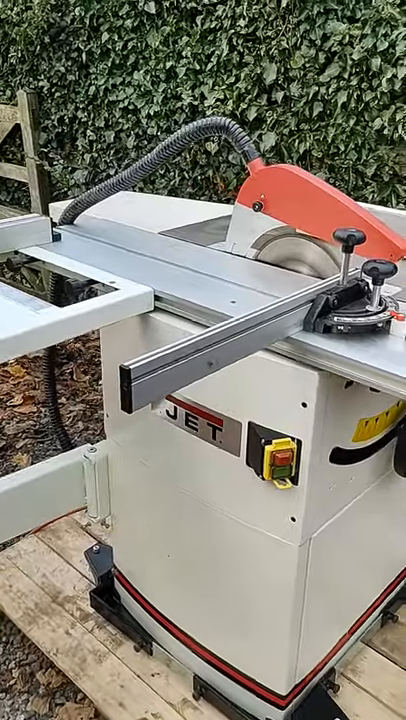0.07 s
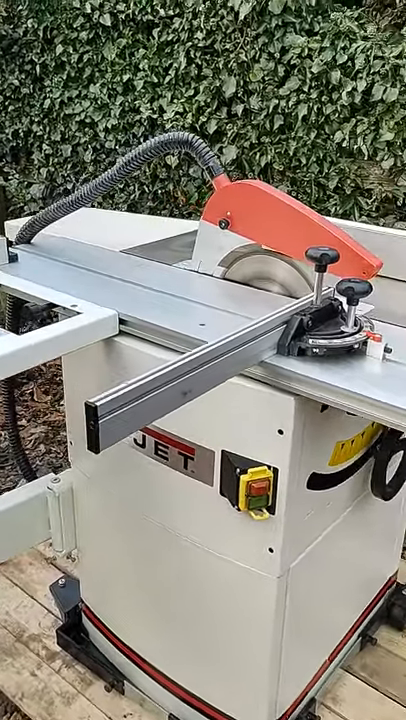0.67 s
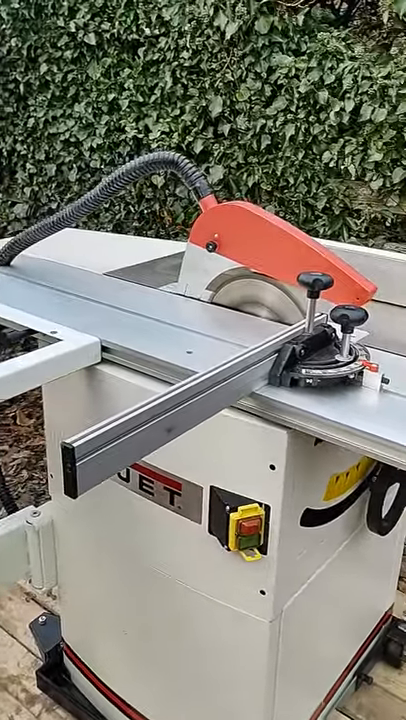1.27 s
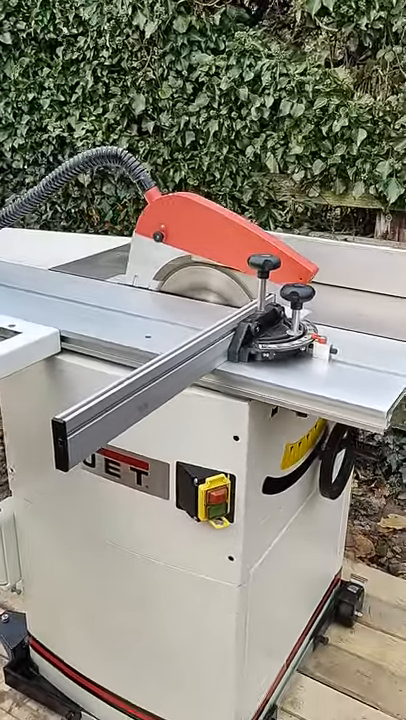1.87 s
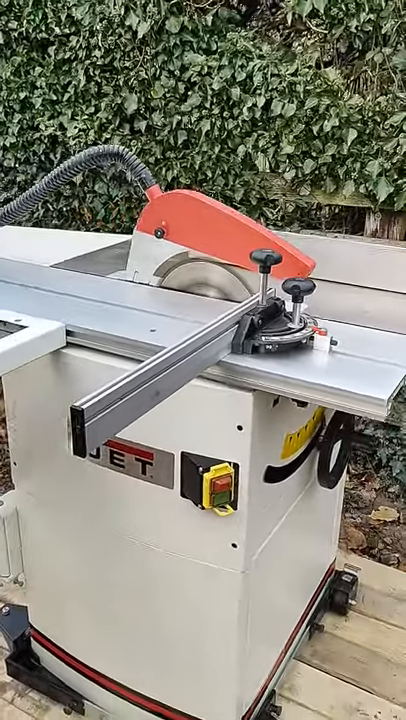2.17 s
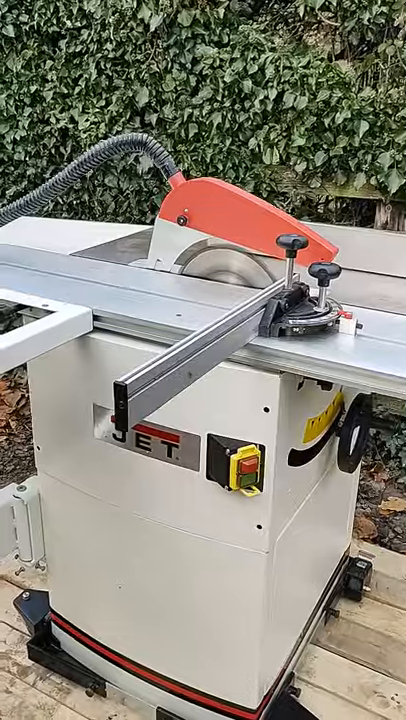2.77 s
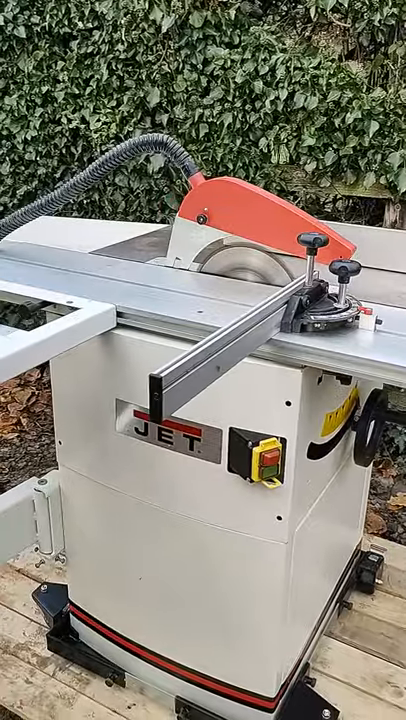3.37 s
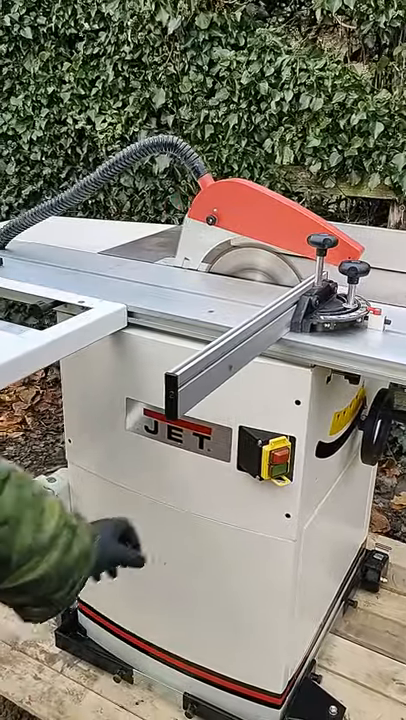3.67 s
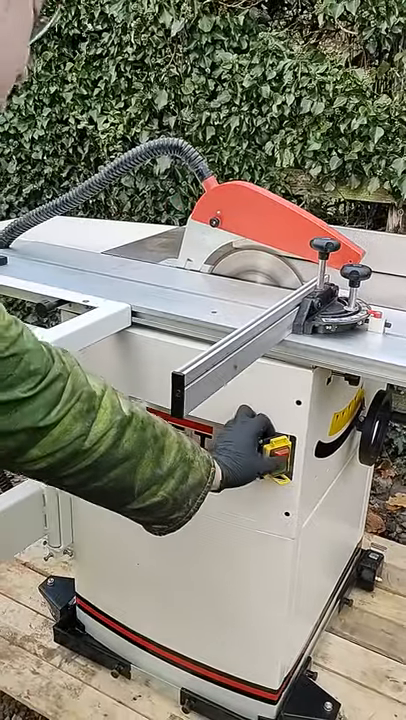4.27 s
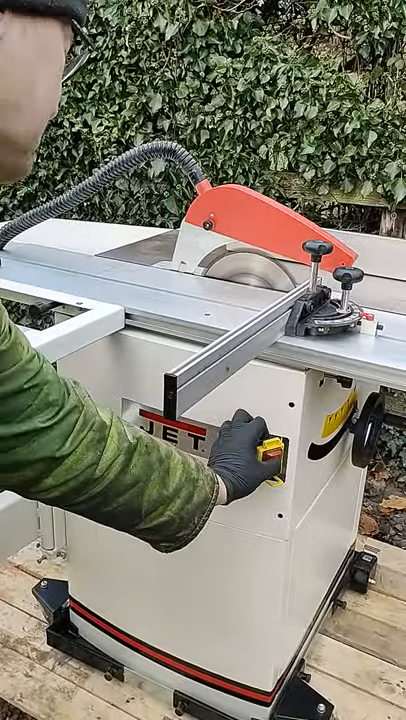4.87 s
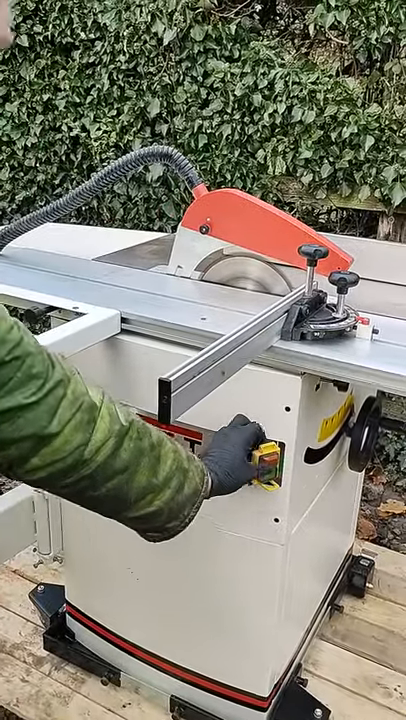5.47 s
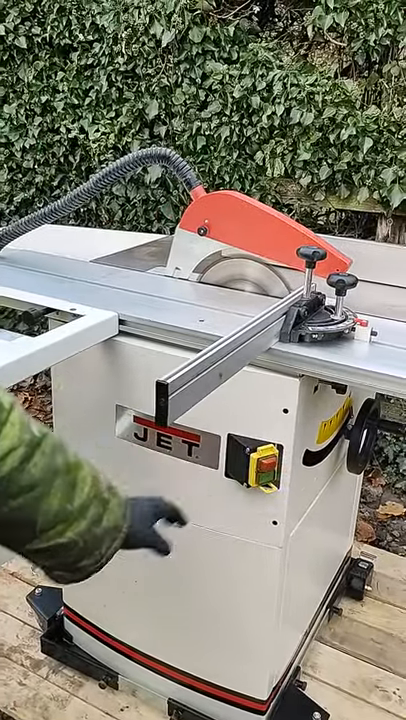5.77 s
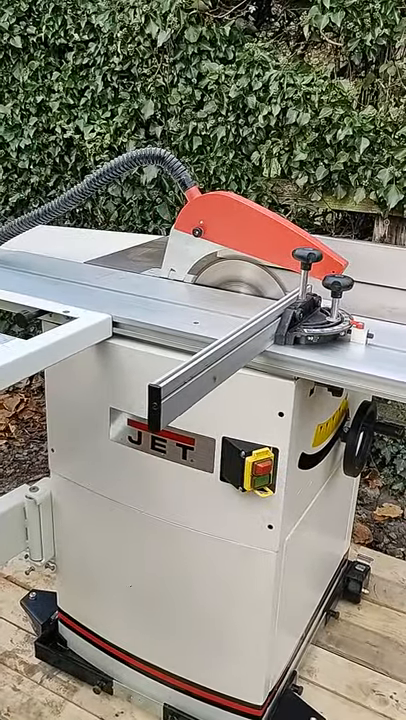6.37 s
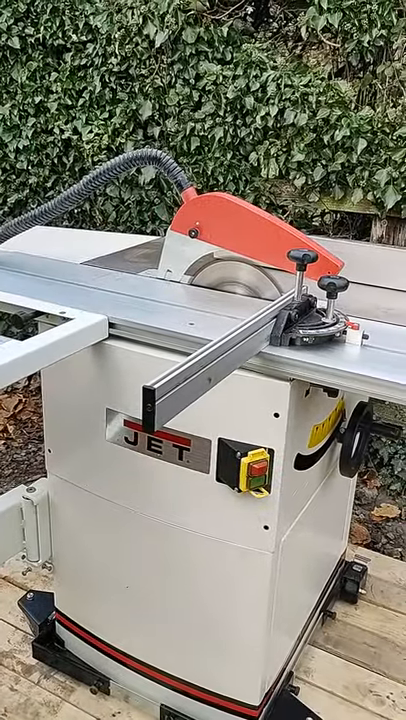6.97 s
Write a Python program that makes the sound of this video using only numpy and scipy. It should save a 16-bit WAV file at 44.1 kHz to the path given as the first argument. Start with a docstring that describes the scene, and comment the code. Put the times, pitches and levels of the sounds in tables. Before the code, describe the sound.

A circular saw bench idles outdoors with a steady hiss and whistle, then winds down in pitch with one sharp clack.

```python
"""A steady hiss and whistle over a low hum: a belt-driven circular saw bench idles outdoors, close by.
Air torn by the forty teeth makes the hiss and whistle, and the motor hums in a sheet-steel cabinet.
The power is cut and the blade coasts. Then a relay clacks, the brake bites, and the blade's sounds
slide down in pitch, swelling as they pass the notes at which the steel naturally rings."""
import sys
import numpy as np
from scipy import signal
from scipy.fft import rfft, irfft, next_fast_len
from scipy.io import wavfile
from scipy.ndimage import map_coordinates

SR = 44100
rng = np.random.default_rng(int(sys.argv[2]) if len(sys.argv) > 2 else 0)


def to_wav(s):
    """Save 16-bit WAV."""
    ch = np.atleast_2d(s).T  # columns
    pcm = np.round(np.clip(ch, -1, 1) * 32767)  # PCM
    wavfile.write(sys.argv[1], SR, pcm.astype(np.int16))


N = 318843


def from_db(db):
    """Turn decibels into a number to multiply a sound by."""
    return 10 ** (np.asarray(db) / 20)


def in_time(rows):
    """Join (time_s, value) points with straight lines, giving a value for every sample."""
    return np.interp(np.arange(N) / SR, *np.transpose(rows))


def unit_power(x):
    """Scale a sound to an average power of 1."""
    return x / np.sqrt(np.mean(x ** 2) + 1e-20)


def drift(rate_hz):
    """A slow random wobble, about 1 in size."""
    hz = np.fft.rfftfreq(N, 1 / SR)
    return unit_power(irfft(rfft(rng.standard_normal(N)) / (1 + (hz / rate_hz) ** 2), N))


def colour(x, outline, unit_hz=1):
    """Shape a sound's lows and highs by (pitch, level_db) rows, then scale it to power 1."""
    size = next_fast_len(N)
    pitch, level_db = np.transpose(outline)
    hz = np.fft.rfftfreq(size, 1 / SR) + 1e-9
    gain = from_db(np.interp(np.log(hz), np.log(pitch * unit_hz), level_db, left=-120, right=-120))
    return unit_power(irfft(rfft(x, size) * gain, size)[:N])


def noise(outline, unit_hz=1):
    """Noise of power 1, shaped by (pitch, level_db) rows."""
    return colour(rng.standard_normal(N), outline, unit_hz)


def tone(hz, flutter_db=0, flutter_hz=5.6):
    """A pure tone that follows a pitch curve; its level wobbles by about flutter_db."""
    phase = 2 * np.pi * (np.cumsum(hz) / SR + rng.random())
    return np.sqrt(2) * np.sin(phase) * from_db(flutter_db * drift(flutter_hz))


def resonate(x, resonances):
    """A sound plus the ringing it stirs up at an object's natural pitches."""
    out = x
    for hz, width_hz, level_db in resonances:
        out = out + from_db(level_db) * signal.lfilter(*signal.iirpeak(hz, hz / width_hz, fs=SR), x)
    return out


def sweep_gain(hz, peaks):
    """How a sound swells and fades as its pitch slides through fixed peaks and dips."""
    return from_db(sum(db * np.exp(-(2 * (hz - peak_hz) / width_hz) ** 2)
                       for peak_hz, width_hz, db in peaks))


def eddies(outline, spin):
    """Noise of small swirls of air at the rim; its pitch slides with spin, in turns per second."""
    read_position = np.cumsum(spin / spin[0])
    return map_coordinates(noise(outline, spin[0]), [read_position], order=3, mode="wrap")


def garden_air():
    """The still outdoor air makes a faint, even noise."""
    # tone colour of the air: pitch_hz, level_db
    air_colour = [(20, -14), (60, -2.5), (90, 5.5), (130, 9), (200, 0), (400, -5), (1000, 3.5), (2700, -12),
                  (4500, -25.5), (7600, -23), (8600, -48)]
    return from_db(-56) * noise(air_colour)


def rushing_air(speed):
    """Air rushes through cabinet and guard; as the blade slows, the treble fades fastest."""
    # tone colour of the rush: pitch_hz, level_db
    rush_colour = [(20, -22.5), (60, -15), (90, -8.5), (125, 0), (170, 0), (270, 3), (370, -3), (520, 0.5),
                   (950, -5.5), (1400, -7), (3000, -1.5), (5600, -6), (7000, -5), (7600, -10.5),
                   (8600, -21)]
    # change in its treble as the listener steps round the bench: time_s, level_db
    treble_change = [(1.5, 0.5), (4, -2.5)]
    air = noise(rush_colour)
    body = signal.sosfiltfilt(signal.butter(1, 2400, fs=SR, output="sos"), air, padtype="even")
    treble = (air - body) * from_db(in_time(treble_change))
    return from_db(-37) * (body * speed ** 1.77 + treble * speed ** 7.7)


def cabinet(spin):
    """Shaft, belt, motor and rushing air shake the steel box; the drive slackens once power is cut."""
    # tones of the slightly unbalanced blade shaft: cycles_per_turn, level_db
    shaft_tones = [(1, -54.5), (10, -59), (20, -61)]
    # belt and motor tones at full speed: pitch_hz, level_db
    drive_tones = [(121.4, -56), (264, -58), (300, -54.5), (502, -58.5), (552, -56), (652, -60.5)]
    # where the box rings: pitch_hz, width_hz, level_db
    box_resonances = [(123.3, 5, 6.5), (290, 8.6, 1.5), (553, 38, -13.5), (1310, 420, -1)]
    power_off_s, slacken_s, hum_hz = 5.18, 0.28, 100
    t = np.arange(N) / SR
    speed = spin / spin[0]
    shaft = sum(from_db(db) * tone(cycles * spin, flutter_db=-1.5, flutter_hz=3.6)
                for cycles, db in shaft_tones)
    drive = sum(from_db(db) * tone(hz * speed) for hz, db in drive_tones)
    belt_pull = np.exp(-(np.maximum(t - power_off_s, 0) / slacken_s) ** 2)
    electric_hum = from_db(-58.5) * (t <= power_off_s) * np.sqrt(2) * np.sin(2 * np.pi * hum_hz * t)
    return resonate((shaft + drive) * belt_pull + electric_hum + rushing_air(speed), box_resonances)


def panel_boom(spin):
    """The turning blade shakes the cabinet; a panel booms when a shake matches its own pitch."""
    # shakes of the blade: cycles_per_turn, level_db
    shakes = [(2, -56), (3, -53), (5, -56.5)]
    # where the panels boom: pitch_hz, width_hz, level_db
    panels = [(127.2, 18, 15.5), (116.6, 4, 12), (297, 14, 14.5)]
    booms = sum(from_db(db) * sweep_gain(cycles * spin, panels)
                * tone(cycles * spin, flutter_db=2.5, flutter_hz=5) for cycles, db in shakes)
    return (spin / spin[0]) ** 3 * booms


def relay_clack():
    """The brake's electric switch snaps over, and each knock briefly rattles the panels."""
    # the knocks: start_s, level_db, fade_s (time to fall by 60 dB)
    knocks = [(6.111, -28, 0.046), (6.115, -22, 0.057), (6.122, -32.5, 0.18), (6.145, -30, 0.091)]
    # tone colour of the rattle: pitch_hz, level_db
    rattle_colour = [(60, -32), (150, -23), (300, -4), (900, -8), (1900, 3.5), (2800, 12.5), (4200, -1),
                     (5200, -18.5), (7700, -18), (8600, -34)]
    t = np.arange(N) / SR
    loudness = sum((t >= start_s) * from_db(db - 60 * np.maximum(t - start_s, 0) / fade_s)
                   for start_s, db, fade_s in knocks)
    return loudness * noise(rattle_colour)


def tooth_whine(spin):
    """Teeth passing the table slot make a clean tone; its octave dies away as the blade slows."""
    # the tone, then its octave: level_db
    levels_db = [-1.5, -16.5]
    # pitches the slot boosts or weakens: pitch_hz, width_hz, level_db
    slot_peaks = [(2600, 330, 8), (2390, 69, -23), (2280, 180, -22), (1980, 270, 2), (1300, 430, -7)]
    teeth = 40
    tooth_hz, speed = teeth * spin, spin / spin[0]
    whine = sum(from_db(db) * speed ** (12 * k)
                * tone((k + 1) * tooth_hz, flutter_db=-0.36, flutter_hz=4.4)
                for k, db in enumerate(levels_db))
    return from_db(-39) * speed ** 1.9 * sweep_gain(tooth_hz, slot_peaks) * whine


def blade_singing(eddy_hz):
    """Swirls of air that come near a natural pitch of the blade fall into step with it, and it sings."""
    # notes the blade can sing: pitch_hz, width_hz, level_db
    notes = [(2013, 80, 1.5), (2755, 140, -2.5), (2976, 190, -1), (3262, 75, -4), (3733, 220, -3.5)]
    lock_range = 0.055  # how near they must come, as a share of the note's pitch
    singing = 0
    for hz, width_hz, level_db in notes:
        band = signal.butter(2, [hz - width_hz / 2, hz + width_hz / 2], "band", fs=SR, output="sos")
        ring = unit_power(signal.sosfilt(band, rng.standard_normal(N)))
        nearness = np.exp(-((eddy_hz / hz - 1) / lock_range) ** 2)
        singing = singing + from_db(level_db) * nearness * ring
    return singing


def blade_air(spin):
    """Swirling air whirls off the tooth tips, whistles in the gaps and hisses in the blade guard."""
    # swirls at the tips, in the gaps between teeth and in the guard: cycles_per_turn, level_db
    tip_swirls = [(22, -29.5), (35, -23.5), (42, -14), (46, -6.5), (49, -5.5), (51.5, -1.5), (54.5, 0.5),
                  (57.5, -5), (62, -9.5), (70, -16), (80, -27), (105, -49.5)]
    gap_swirls = [(14, -23), (18.5, -18.5), (22.5, -22.5), (26, -11.5), (28.3, -8.5), (29.9, 2),
                  (31.2, -2.5), (33, -15), (38, -35)]
    guard_swirls = [(30, -0.5), (76, -2), (86, -6.5), (100, -22.5)]
    # peak and dip of the hollow under the guard: pitch_hz, width_hz, level_db
    hollow_peaks = [(1325, 230, 5), (930, 160, -7)]
    # tone colour of the hiss in the guard: pitch_hz, level_db
    hiss_colour = [(2500, -24), (3400, -4), (3950, 0.5), (4250, -20.5), (4700, -2), (5400, -21.5),
                   (7000, -35.5)]
    # where the steel blade rings: pitch_hz, width_hz, level_db
    blade_resonances = [(1330, 150, 0), (2042, 135, 1.5), (2750, 250, -5.5), (3296, 250, -6),
                        (3646, 190, -1.5), (3976, 120, -10.5)]
    # the blade as the listener steps round the bench: time_s, whirl_db, whirl_hz, whistle_db
    walk = [(0.15, -27, 3880, -39), (0.86, -26.5, 3904, -36.5), (1.79, -25.5, 3873, -36.5),
            (4.7, -26.5, 3720, -38.5), (4.9, -26, 3707, -38.5)]
    whirl_at_switch_hz = 3709  # the full-speed whirl, heard from the power switch
    tip_cycles, gap_cycles = 53.52, 28.5  # main swirl rates, per turn
    speed = spin / spin[0]
    whirl_db, whirl_hz, whistle_db = (in_time(np.array(walk)[:, [0, k]]) for k in (1, 2, 3))
    heard_spin = spin * whirl_hz / whirl_at_switch_hz
    singing = blade_singing(tip_cycles * heard_spin)
    # the higher the power of speed, the sooner a sound fades as the blade slows
    whirl = from_db(whirl_db - 3) * speed ** 2.3 * (eddies(tip_swirls, heard_spin) + singing)
    hollow_gain = sweep_gain(gap_cycles * spin, hollow_peaks)
    whistle = from_db(whistle_db - 3) * speed ** 1.88 * hollow_gain * eddies(gap_swirls, spin)
    hiss = from_db(whirl_db - 15) * speed ** 3.9 * colour(eddies(guard_swirls, spin), hiss_colour)
    return resonate(whirl + whistle, blade_resonances) + hiss


def scene():
    """The saw idles, coasts and brakes in the open air."""
    # how fast the blade turns: time_s, turns_per_s
    blade_speed = [(5.1, 71.015), (5.4, 66.6), (5.65, 63.7), (5.96, 61.0), (6.13, 59.3), (6.41, 52.7),
                   (6.7, 45.4), (7.23, 32.3)]
    spin = in_time(blade_speed)
    saw = blade_air(spin) + tooth_whine(spin) + cabinet(spin) + panel_boom(spin) + relay_clack()
    return (saw + garden_air())[None]


def record(dry):
    """Thin out the deep bass and cut off the highest treble steeply."""
    bass_cut_hz, treble_cut_hz = 45, 8650
    thinned = signal.sosfilt(signal.butter(2, bass_cut_hz, "high", fs=SR, output="sos"), dry)
    return signal.sosfilt(signal.cheby2(16, 60, treble_cut_hz, fs=SR, output="sos"), thinned)


dry = scene()
out = record(dry)
to_wav(out)
```